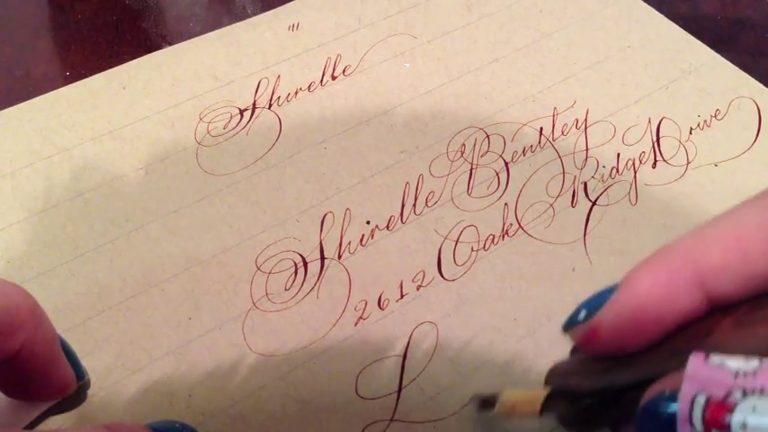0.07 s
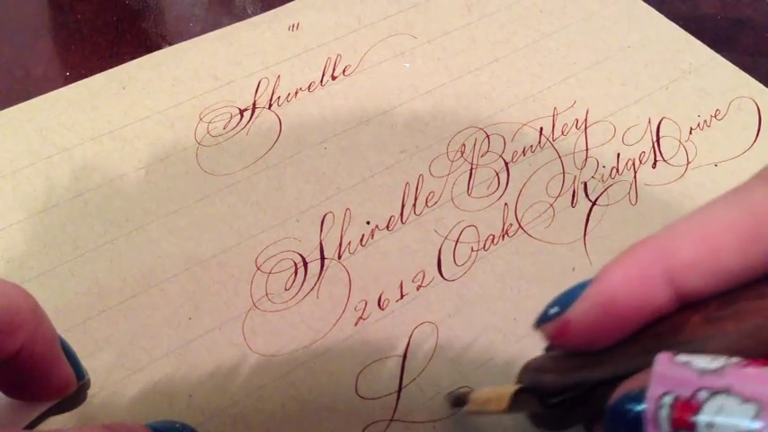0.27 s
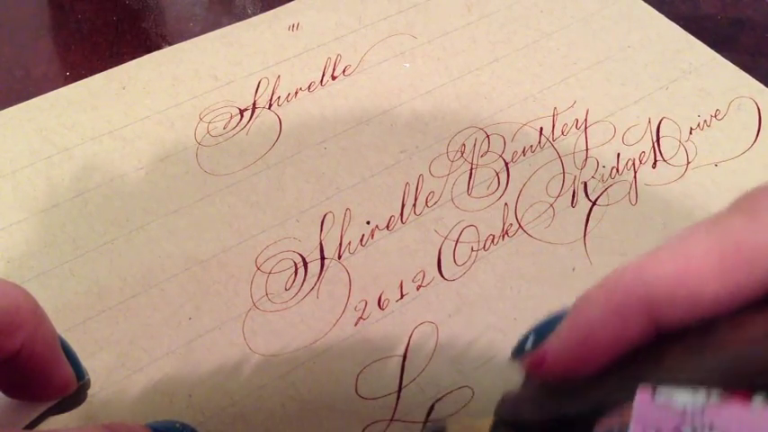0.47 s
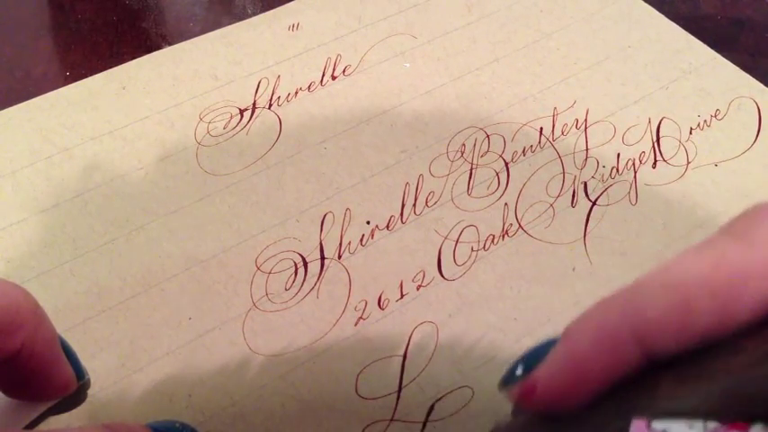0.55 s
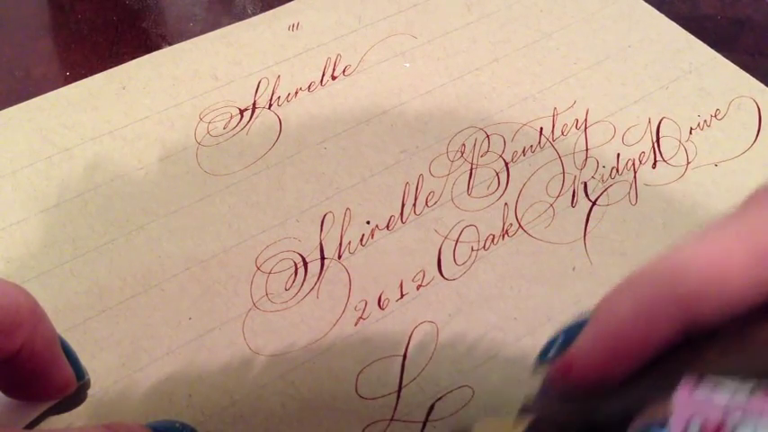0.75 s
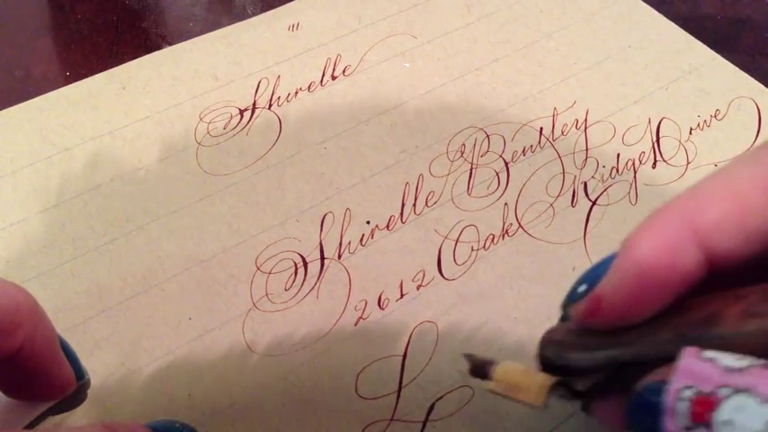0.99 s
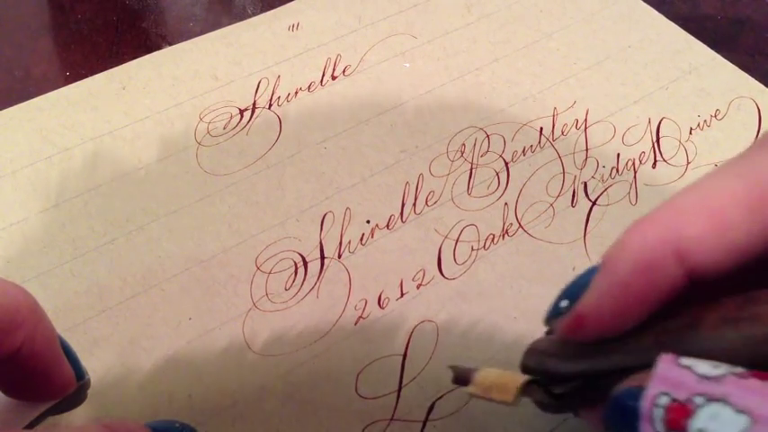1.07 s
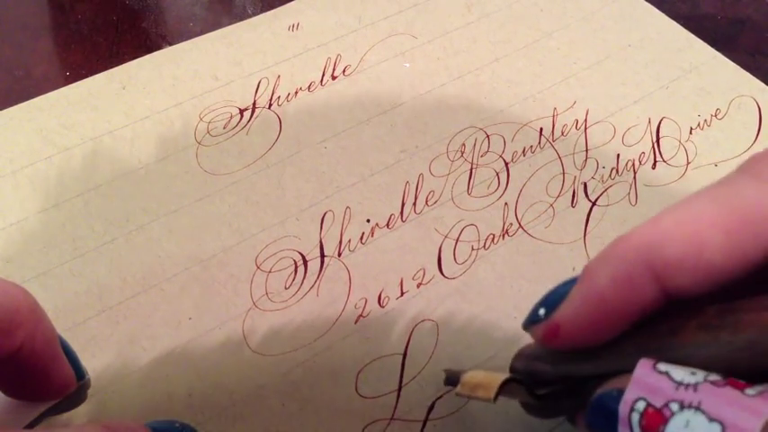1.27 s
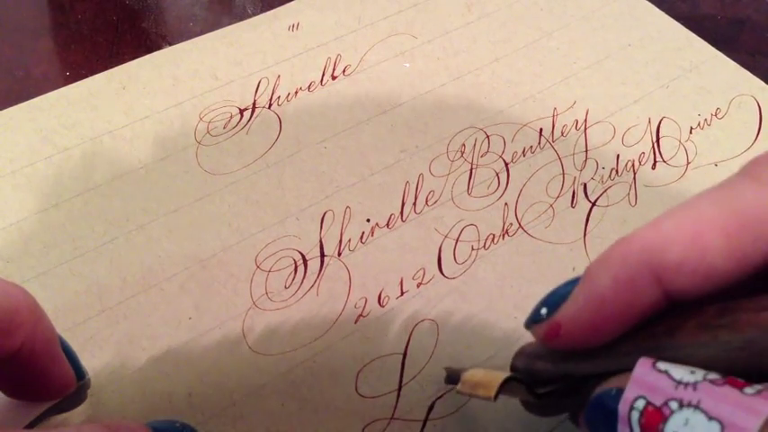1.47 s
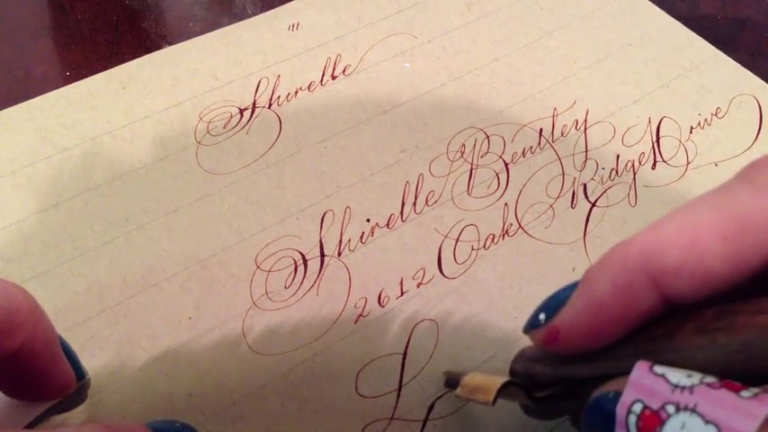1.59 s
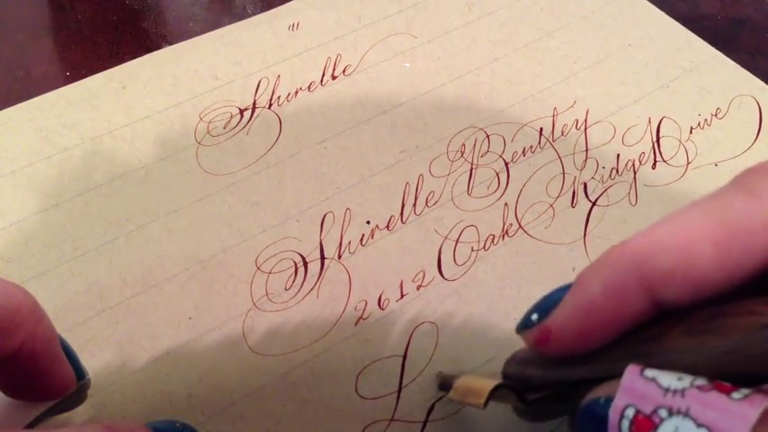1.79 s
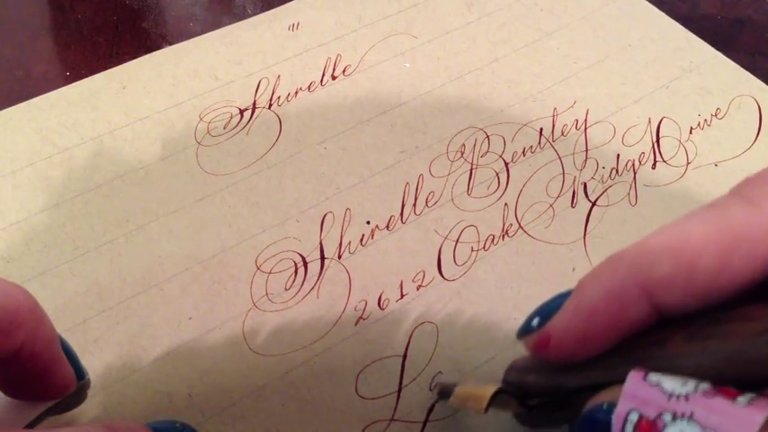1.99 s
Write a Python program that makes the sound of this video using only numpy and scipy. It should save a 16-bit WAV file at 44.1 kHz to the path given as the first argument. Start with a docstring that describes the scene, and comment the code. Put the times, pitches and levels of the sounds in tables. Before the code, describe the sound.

A steel dip pen scratches and clicks on paper, close by in a quiet room.

```python
"""A steel dip pen glides over paper with a fine hiss, close by, on a desk in a quiet room.
The nib snags on fibres, digs in for one rasping stroke and lifts; later it glides again, lightly.
Tiny slips of steel over fibres ring the resonances of nib, holder and sheet.
Underneath: a low rumble with a hum, and a faint steady hiss."""
import sys
import numpy as np
from scipy import signal
from scipy.fft import rfft, irfft
from scipy.io import wavfile

SR = 44100
rng = np.random.default_rng(int(sys.argv[2]) if len(sys.argv) > 2 else 0)


def log_audio(samples):
    """Write samples as a 16-bit WAV file to the path given in sys.argv[1]."""
    # one column per channel
    frames = np.atleast_2d(samples).T
    # limit to full scale, then quantise
    limited = np.clip(frames, -1, 1)
    pcm = np.round(limited * 32767).astype(np.int16)
    wavfile.write(sys.argv[1], SR, pcm)


N = 90404
TIME_S = np.arange(N) / SR

# nib, holder and sheet: (frequency [Hz], width [Hz], gliding gain [dB], digging gain [dB])
PEN_RESONANCES = [(444, 41, -17, -5.5), (824, 174, -56, -16), (1320, 134, -19, -15),
                  (2051, 113.5, -3.5, -1), (2410, 200, -12, -3), (3350, 600, -17, -10), (4090, 310, -9, -2),
                  (4622, 198, 1, 4.5), (5450, 190, -36, -3.5), (6130, 450, -18, -4), (6470, 345, -17, -1.5),
                  (7350, 470, -12, -5.5), (8350, 430, -24, -12.5), (9930, 400, -10, -5.5),
                  (11360, 370, -28, -16.5), (12400, 700, -22, -15.5)]
# notches between the resonances: (frequency [Hz], width [Hz], gain [dB])
PEN_ANTIRESONANCES = [(3080, 120, -8), (5280, 100, -7)]
# light strokes, one list each: (time [s], level [dB])
GLIDE_ENVELOPES = [
    [(0, -54.5), (.06, -57.5), (.078, -54), (.1, -58.5), (.14, -60.5), (.15, -71), (.195, -77)],
    [(.2, -61), (.235, -71), (.27, -57.5), (.3, -65), (.335, -51), (.365, -61), (.4, -56.5), (.445, -69),
     (.52, -65)],
    [(1.83, -78), (1.865, -64), (1.875, -60.5), (1.885, -66), (1.905, -60), (1.92, -66), (1.932, -70),
     (1.96, -79)],
    [(2.0, -83), (2.035, -65), (2.042, -58.5), (2.06, -61)],
]
# heavy stroke: (time [s], level [dB])
SCRATCH_ENVELOPE = [(.527, -76), (.53, -35), (.55, -40.5), (.56, -39), (.569, -35), (.582, -44.5),
                    (.598, -44), (.607, -52), (.628, -56), (.645, -82)]
# catches on fibres: (start [s], length [s], level [dB], rasp gain [dB], top gain [dB])
FIBRE_SNAGS = [(0.044, 0.0036, -60, -26, -12), (0.0733, 0.00047, -43, -11, 12),
               (0.225, 0.0008, -34.5, -8, 15), (0.2304, 0.0014, -41.5, 1, 14), (0.252, 0.0012, -51, -8, -4),
               (0.267, 0.0022, -50.5, 0, -4), (0.277, 0.0015, -52, -6, -3), (.2882, 0.00065, -35, -21, -6),
               (0.3233, 0.0019, -54.5, 22, -10), (0.3899, 0.0021, -40, 9.5, 8),
               (0.3915, 0.0026, -47.5, 1, -13), (0.3937, 0.0053, -48, -4, 5),
               (0.4065, 0.0021, -47, -2, -13), (0.4103, 0.0028, -39, -15, -16),
               (0.4301, .0048, -33, 7.5, 2), (0.459, 0.0038, -53, -3, -2), (0.4628, 0.0035, -40.5, 4.5, 1),
               (0.482, 0.0014, -44.5, 5, 3), (.4900, 0.00078, -48, -2, -1), (0.4914, 0.0025, -33, -3.5, 11),
               (0.5146, 0.0057, -29.5, 11.5, -2), (0.5464, 0.0022, -32, 4.5, 0),
               (0.5525, 0.001, -31, -1, 3), (1.902, 0.01, -61, -4, -4), (1.919, 0.0016, -55.5, 1, -3)]
# rumble before its low cut: (frequency [Hz], relative density [dB])
RUMBLE_SPECTRUM = [(60, -31), (110, -1), (160, -1), (280, 4.5), (360, 0), (430, -4.5), (600, -9.5),
                   (1100, -16.5), (3000, -34)]
# rumble, sinking after the heavy stroke: (time [s], level [dB])
RUMBLE_ENVELOPE = [(0, -61.5), (.4, -67), (.5, -65), (.56, -61), (.65, -78), (1.01, -81.5), (1.035, -67.5),
                   (1.2, -66.5), (1.55, -65), (1.85, -66), (2.05, -64.5)]
# low hum tone: (time [s], level [dB])
HUM_LOW_ENVELOPE = [(0, -64), (0.042, -61), (.1, -75), (.165, -63), (.235, -82), (.3, -62.5), (.37, -87),
                    (.43, -71), (.6, -82.5), (1.12, -89), (1.19, -75), (1.35, -72.5), (1.601, -77.5),
                    (2.05, -74.5)]
# middle hum tone: (time [s], level [dB])
HUM_MIDDLE_ENVELOPE = [(0, -84), (.55, -72), (.7, -91), (1.1, -91), (1.2, -74), (1.9, -75.5), (1.96, -67),
                       (2.05, -63.5)]
# steady room noise: (frequency [Hz], relative density [dB])
HISS_SPECTRUM = [(25, -29), (60, -22), (95, -19), (130, -9.5), (250, -8), (370, -7), (500, -2.5),
                 (620, -7.5), (1000, -10.5), (1500, -15), (2500, -17.5), (7000, -19.5), (15000, -21.5)]


def gliding():
    """Light strokes: a dense, even stream of slips."""
    force = slips(rate_per_s=5400, spread_db=-1)
    return sum(map(stroke_gain, GLIDE_ENVELOPES)) * unit_rms(pen_body(force, digging=False))


def scratching():
    """Heavy stroke: coarser slips, fading as the nib lifts."""
    force = slips(rate_per_s=5500, spread_db=3.5)
    return stroke_gain(SCRATCH_ENVELOPE) * unit_rms(pen_body(force, digging=True))


def snagging(release_s=0.00081, crack=7.7, samples=2048):
    """The nib catches a fibre and tears free: a crack, then a dying run of slips."""
    out, time_s = np.zeros(N + samples), TIME_S[:samples]
    for start_s, length_s, level_db, rasp_db, top_db in FIBRE_SNAGS:
        release = np.exp(-np.maximum(time_s - length_s, 0) / release_s)
        force = slips(rate_per_s=6500, spread_db=1.5, samples=samples) * release
        force[0] += crack
        snag = pen_body(force, digging=True)
        snag = bell(snag, hz=6450, width_hz=1260, gain_db=rasp_db)
        snag = bell(snag, hz=11400, width_hz=7400, gain_db=top_db)
        duty = (length_s + release_s) / time_s[-1]  # refers the level to the snag's duration
        onset = int(start_s * SR)
        out[onset:onset + samples] += from_db(level_db) * unit_rms(snag) * np.sqrt(duty)
    return out[:N]


def slips(rate_per_s, spread_db, samples=N):
    """Steel slipping over paper fibres: random force impulses, unit rms."""
    sizes = from_db(spread_db * np.minimum(rng.exponential(1, samples), 4))
    signs = rng.choice([-1, 1], samples)
    slipping = rng.random(samples) < rate_per_s / SR
    return unit_rms(sizes * signs * slipping)


def pen_body(force, digging):
    """Tip force rings nib, holder and sheet; modes alternate in sign."""
    out = sum((-1) ** k * from_db(dig_db if digging else glide_db) * resonance(force, hz, width_hz)
              for k, (hz, width_hz, glide_db, dig_db) in enumerate(PEN_RESONANCES))
    for hz, width_hz, gain_db in PEN_ANTIRESONANCES:
        out = bell(out, hz, width_hz, gain_db)
    return out


def reflections(x, t60_s=.14, gain_db=-17.5, lowpass_hz=4800, delay_s=0.0045):
    """Short, dull tail from desk and walls."""
    time_s = TIME_S[:SR // 2]
    tail = butter(rng.standard_normal(len(time_s)), lowpass_hz, "low", order=1)
    tail *= from_db(-60 * time_s / t60_s) * (time_s > delay_s)
    return from_db(gain_db) * signal.fftconvolve(x, tail / np.linalg.norm(tail))[:N]


def rumble(low_cut_hz=109, tone_hz=235.2, tone_relative_db=-5.5):
    """Low noise and the hum's upper tone under one envelope."""
    noise = unit_rms(butter(coloured_noise(RUMBLE_SPECTRUM), low_cut_hz, "high", order=10))
    upper_tone = from_db(tone_relative_db) * wavering_tone(tone_hz)
    return gain_curve(RUMBLE_ENVELOPE) * (noise + upper_tone)


def hum(low_hz=121.3, middle_hz=178):
    """Two tones: the low one throbs at first, the middle one swells at the end."""
    low = gain_curve(HUM_LOW_ENVELOPE) * np.sin(2 * np.pi * low_hz * TIME_S)
    middle = gain_curve(HUM_MIDDLE_ENVELOPE) * wavering_tone(middle_hz)
    return np.sqrt(2) * (low + middle)


def wavering_tone(hz, waver_db=1.6, waver_hz=5):
    """Sine with a slowly wandering level."""
    waver = unit_rms(butter(rng.standard_normal(N), waver_hz, "low"))
    return np.sin(2 * np.pi * (hz * TIME_S + rng.random())) * from_db(waver_db * waver)


def hiss(level_db=-64):
    """Steady broadband room noise."""
    return from_db(level_db) * coloured_noise(HISS_SPECTRUM)


def room_tone(hz=467, width_hz=16.3, level_db=-71.5):
    """Narrow band standing out of the room noise."""
    return from_db(level_db) * unit_rms(resonance(rng.standard_normal(N), hz, width_hz))


def from_db(db):
    """Decibels to gain."""
    return 10 ** (np.asarray(db) / 20)


def unit_rms(x):
    """Scale to unit rms."""
    return x / np.sqrt(np.mean(x ** 2) + 1e-20)


def gain_curve(envelope):
    """Gain along (time [s], level [dB]) points, ends held."""
    return from_db(np.interp(TIME_S, *np.transpose(envelope)))


def stroke_gain(envelope):
    """Gain curve, silent outside the stroke."""
    return gain_curve(envelope) * (TIME_S >= envelope[0][0]) * (TIME_S <= envelope[-1][0])


def butter(x, hz, kind, order=2):
    """Causal Butterworth filter."""
    return signal.sosfilt(signal.butter(order, hz, kind, fs=SR, output="sos"), x)


def resonance(x, hz, width_hz):
    """Two-pole resonance, unit peak gain."""
    radius = np.exp(-np.pi * width_hz / SR)
    numerator = (1 - radius ** 2) / 2 * np.array([1, 0, -1])
    denominator = [1, -2 * radius * np.cos(2 * np.pi * hz / SR), radius ** 2]
    return signal.lfilter(numerator, denominator, x + 1e-18)


def bell(x, hz, width_hz, gain_db):
    """Boost or cut one band."""
    return x + (from_db(gain_db) - 1) * resonance(x, hz, width_hz)


def coloured_noise(spectrum):
    """Unit-rms noise shaped by (frequency [Hz], relative density [dB]) points."""
    hz, db = np.transpose(spectrum)
    bins_hz = np.maximum(np.arange(N // 2 + 1) * SR / N, 1)
    gain = from_db(np.interp(np.log(bins_hz), np.log(hz), db))
    return unit_rms(irfft(rfft(rng.standard_normal(N)) * gain, N))


def scene():
    """Pen, reflections and background, mono."""
    writing = gliding() + scratching() + snagging()
    return (writing + room_tone() + reflections(writing) + rumble() + hum() + hiss())[None]


def record(dry):
    """Steep elliptic low-pass."""
    cutoff_hz = 15250
    return signal.sosfilt(signal.ellip(10, .2, 70, cutoff_hz, fs=SR, output="sos"), dry)


dry = scene()
out = record(dry)
log_audio(out)
```